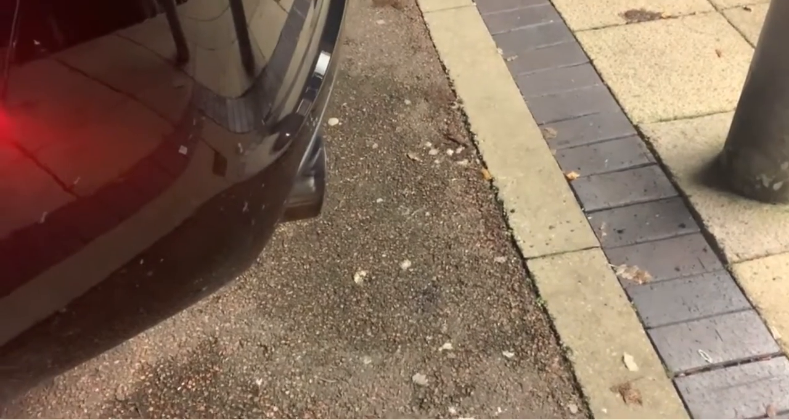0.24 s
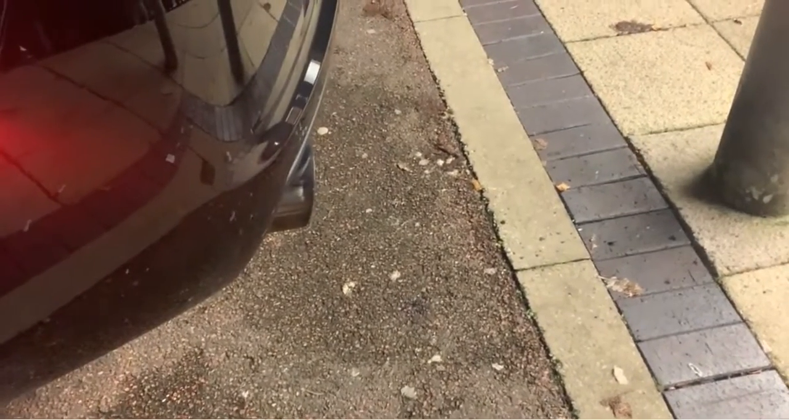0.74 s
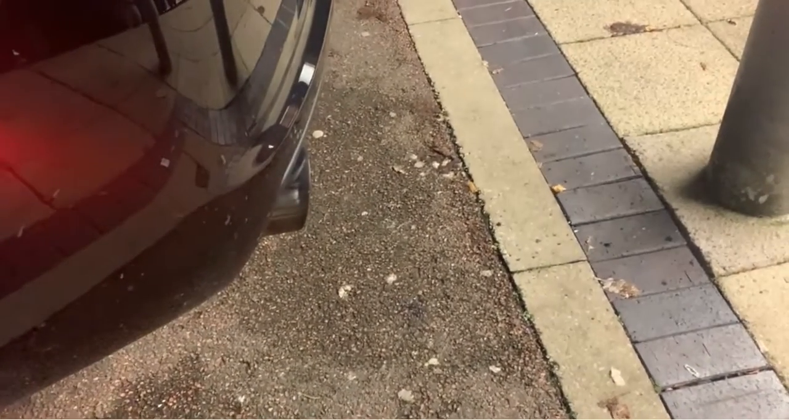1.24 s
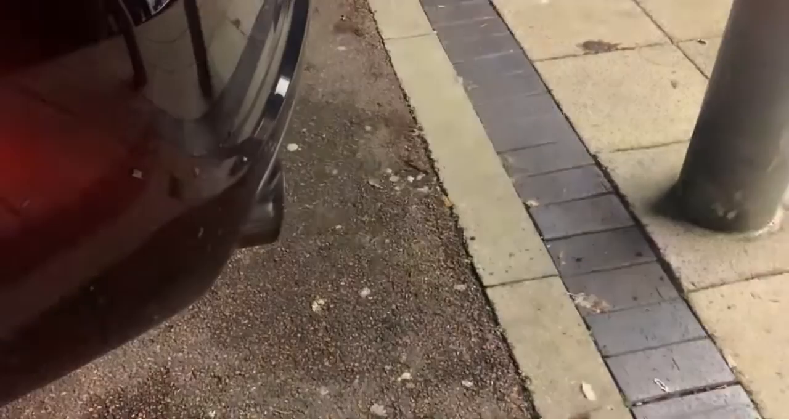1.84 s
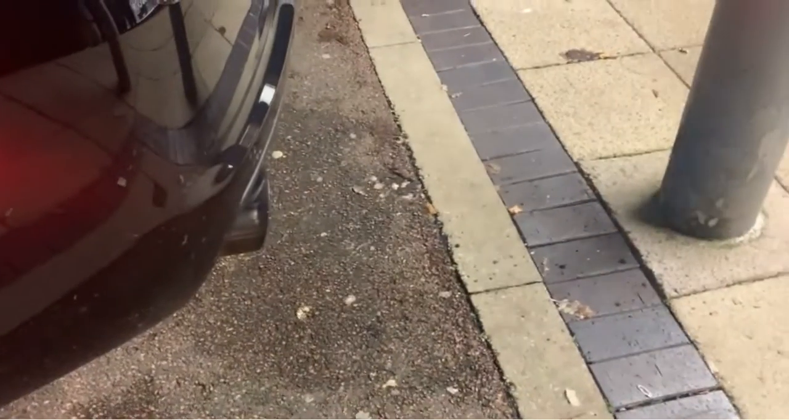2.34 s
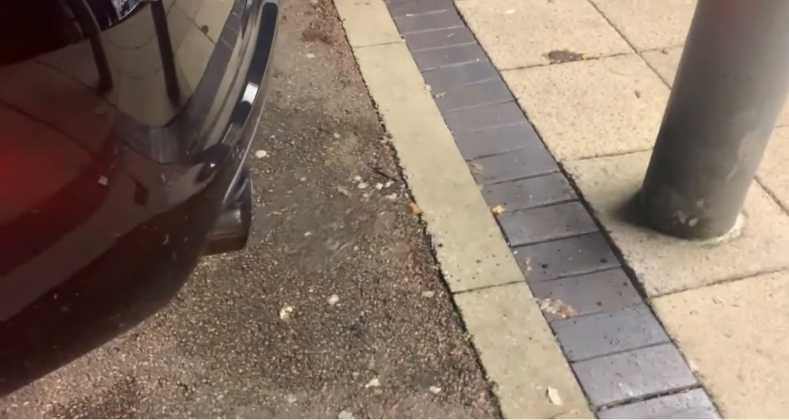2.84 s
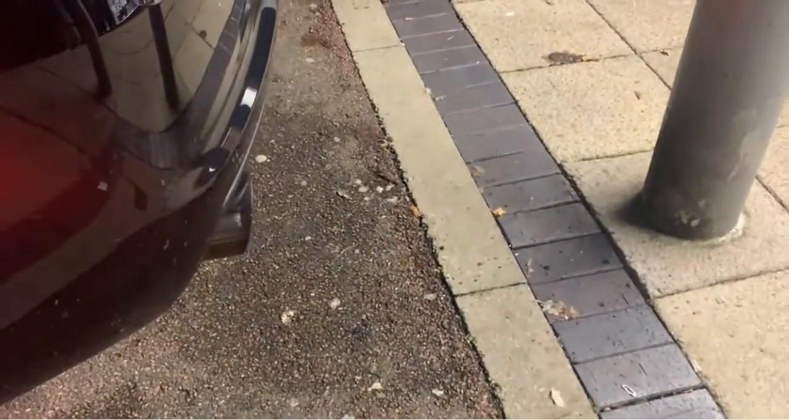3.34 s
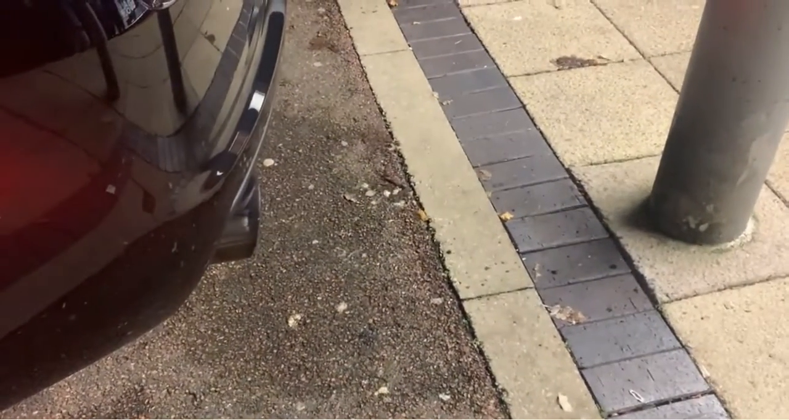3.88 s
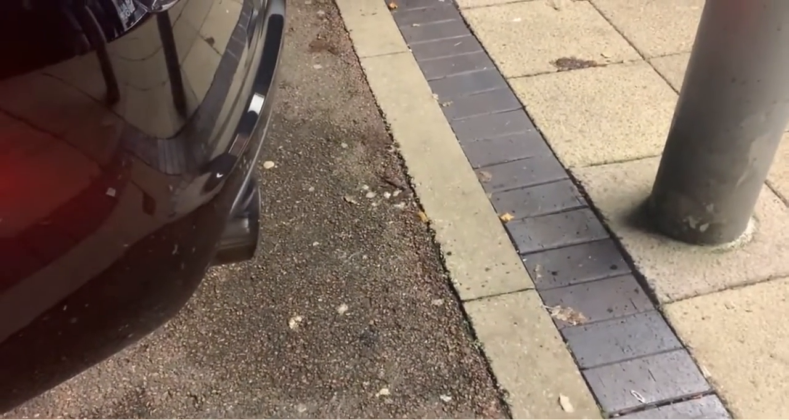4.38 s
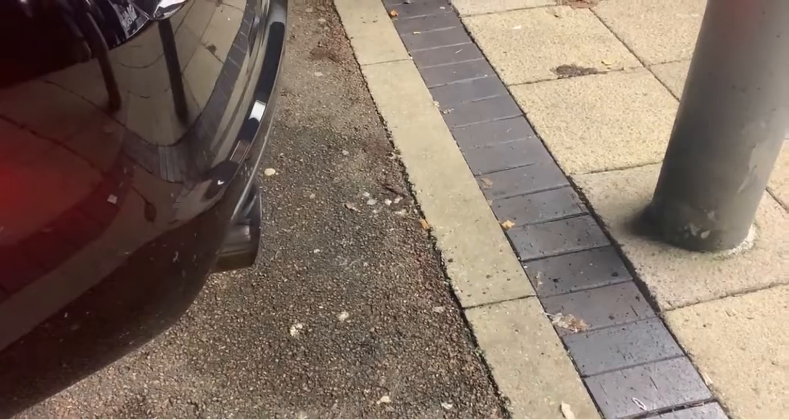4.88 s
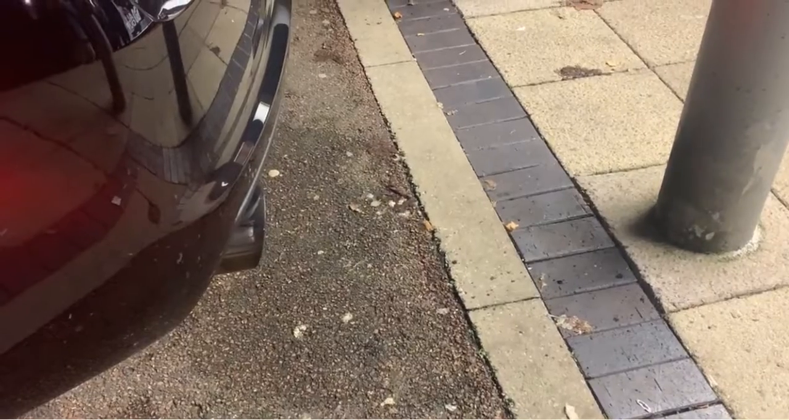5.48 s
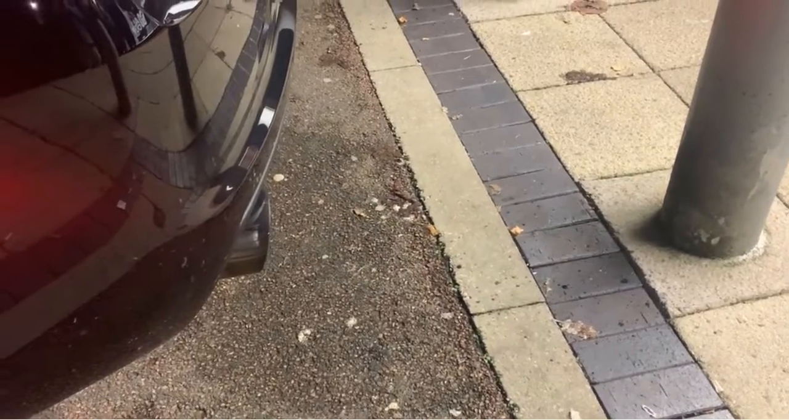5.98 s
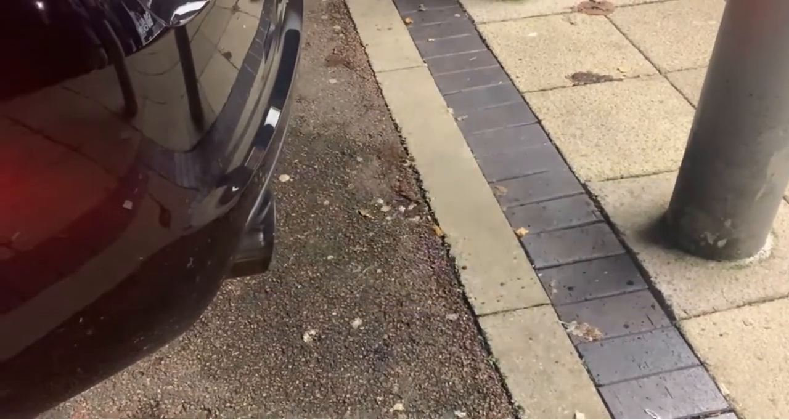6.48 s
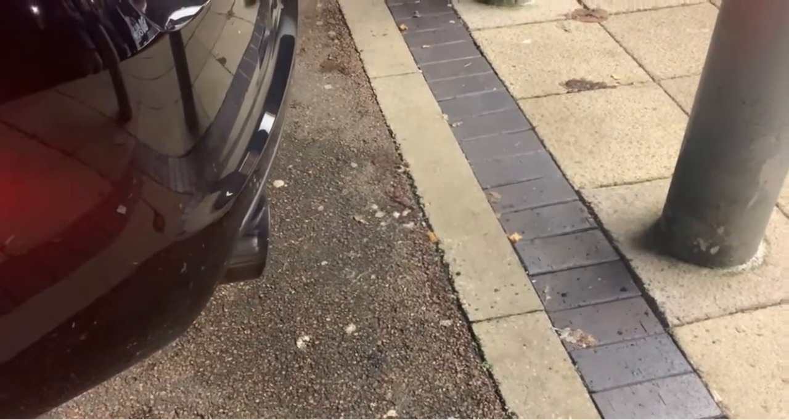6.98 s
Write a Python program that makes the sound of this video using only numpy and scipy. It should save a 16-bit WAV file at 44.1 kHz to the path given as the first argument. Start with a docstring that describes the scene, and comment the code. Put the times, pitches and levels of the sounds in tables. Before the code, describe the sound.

A parked car idles roughly while its hot tailpipe backfires in tight bursts of gunshot-like pops and cracks, echoing off nearby house fronts.

```python
"""Idling car with exhaust backfire

A parked car idles with a lumpy beat on a night street; unburnt fuel explodes in its hot exhaust in volleys of pops.
Each pop sums a crack, pipe resonances and a falling chirp, a silencer thump and a ragged roar of shaped noise.
Firing impulses and noise excite the silencer modes for the idle, over rasping and hissing gas noise.
House fronts return a long hiss, made by decaying noise echoes, and far traffic is a steady low noise.
A microphone close by limits the loudest blasts."""
import sys
import numpy as np
from scipy import signal
from scipy.fft import rfft, irfft, next_fast_len
from scipy.io import wavfile
from scipy.ndimage import uniform_filter1d, minimum_filter1d, map_coordinates

SR = 44100
rng = np.random.default_rng(int(sys.argv[2]) if len(sys.argv) > 2 else 0)


def wav_record(signal):
    """Record a signal, one row per channel, as 16-bit PCM in the file named by sys.argv[1]."""
    frames = np.transpose(np.atleast_2d(signal))
    bounded = np.clip(frames, -1, 1)
    # unit amplitude maps onto the largest positive 16-bit level
    quanta = np.round(bounded * 32767).astype(np.int16)
    wavfile.write(sys.argv[1], SR, quanta)


N = 318400

# explosions in the exhaust: start_s, level_db, thump_db (relative to level_db),
# brightness_db_per_octave (well above 1100 Hz), snap_db (relative to level_db)
EXPLOSIONS = [(.177, -18.5, -33, -7.5, -5), (.206, -32, -3, -4, -1), (.276, -21, -13, -1, 5),
              (.293, -18, 4, -6, 0), (.301, -10, 0, -1.5, 1), (.325, -6, 3, -2, -6), (.35, -1, -3, -3, -13),
              (.375, -3.5, -11, -4, 1), (.394, -5.5, -15, -2, -4), (.416, -6.5, -10, -8, -1),
              (.442, -13, -1, -4, 7), (.484, -24, 2, 3, -3), (.694, -6.5, -2, -13, -3),
              (.856, -0.5, -25, 1, 2), (.891, -8, -10, 2, -5), (.912, 2.5, -6, 1.5, 14.5),
              (.956, -13, -3, 3.5, -3), (.984, -11, 0, -1.5, -7), (1.023, -17, -10, -0.5, 0),
              (1.069, -12, -6, -4, -4), (1.082, 1, -1.5, -3.5, -3), (1.11, -3, -13, -0.5, 0.5),
              (1.133, 1.5, -9, -2.5, 0), (1.161, -7.5, -30, 1, -5), (1.175, -18, 4, 3.5, -2),
              (1.203, -21.5, 4, 1, 2), (1.514, 0, -19, -2.5, -0.5), (1.548, -6, 1.5, -3.5, -19),
              (1.579, -17, -4, -6, -6), (1.705, -17, 4, -1, -6), (1.722, -8, -12, 1, 11),
              (1.735, -2, -13, -6, -1), (1.755, -1.5, -12, -2, 7), (1.781, 0, -30, -1, 8),
              (1.811, -4, -14, -0.5, 1), (1.822, -5.5, -24, -0.5, 8), (1.85, -10, -22, 0.5, -6),
              (2.156, -16, -5, -10, -2.5), (2.248, -12.5, -7, -11, -29), (2.371, -1, -4, -3.5, 8),
              (2.396, -6, -21, 3.5, 5), (2.423, 0.5, -15, 2.5, 8), (2.44, -10, -7, 0, -1),
              (2.459, -10.5, -22, 0.5, -10), (2.526, -16, 3, 0.5, 0), (2.543, -15.5, 2, -6, 5),
              (3.01, -4, -32, -1, 1), (3.024, -2, -17, -5.5, -6), (3.049, -13.5, 3, -8, -7),
              (3.114, -19, 3.5, -9, -2), (3.206, -7, -5, -3.5, -22), (3.225, -0.5, -13, -3.5, -3),
              (3.249, -6, -20, 1.5, 6), (3.273, -10, -6, 2, -6), (3.385, -13, 0, -13, -6),
              (3.401, -13.5, -2, -11, 4), (3.7, -4.5, -18, 1.5, 4), (3.708, -17, -26, 4.5, 3),
              (3.725, -8, 0, -1, -13), (3.742, -3, -25, -2.5, -4), (3.76, -8.5, -11, -9, -4),
              (3.977, -24.5, 6, -18, 2), (4.056, -17.5, -5, -3.5, 3), (4.064, -9.5, -5.5, -4.5, -15),
              (4.079, -15, -6.5, -2, -23), (4.093, -11, 0, -3, -13), (4.119, -15.5, -11, -7, 5),
              (4.415, -21, 7, -5.5, -2), (4.683, -26.5, 9.5, 1.5, -3), (4.74, -22.5, 2, -4, -7.5),
              (4.755, -6.5, -6, -5.5, -4.5), (4.775, -6, -6, -3, 6), (4.789, -4.5, -8, -2, -1),
              (4.809, -1.5, -8, -3, 1), (4.829, -5.5, -5, 2, 2), (4.849, -5, -17, 0.5, -1),
              (4.872, -9.5, -11, 0.5, 8), (4.989, -4.5, -8.5, -3.5, 2.5), (5.031, -14, -3, -5, -7),
              (5.071, -13.5, -2, -5, -8), (5.099, -9.5, -7, -9, -3), (5.196, 0, -16.5, 1.5, 10),
              (5.208, -10.5, -13, -1, 1), (5.229, -12, -8, 2.5, 2), (5.253, -23, -6, -1.5, 10),
              (5.497, -10.5, -11, -3.5, -6), (5.512, -7, -6, 0, 4.5), (5.519, -0.5, -3, -14, -3),
              (5.538, -10.5, 2.5, -17, -13), (5.57, -15, 0, -6, -7), (5.8, -14, -2, -13, -38),
              (5.905, -5.5, -2, -6.5, -8), (5.921, 1, -14, 1, 7), (5.952, -8.5, -9, 2, 6),
              (5.968, -5, -4, 0.5, 8), (5.993, 4, -7, -0.5, -9), (6.036, -6, -19, -1.5, 5),
              (6.059, -18, -7, -8, 8), (6.402, -2.5, -0.5, .5, -15), (6.432, 0, -16, 1, -4),
              (6.459, -15.5, 3, 0, -5), (6.513, -18, -10, -17, -6), (6.658, 0.5, -23, 1, 9),
              (6.684, -3, -5, -1.5, 9), (6.709, -12, -16, 1.5, 6), (6.74, -30, -21, -5, 2),
              (6.865, -10, -6, -4, 10.5), (6.955, -13.5, -4, -4.5, -5), (7.061, -1.5, -42, -1, 3),
              (7.07, -16, -30, -7, 9), (7.085, -4.5, -10, 3, 6), (7.111, -4.5, -35, 1.5, 2),
              (7.129, -8, -5, 3, 10), (7.157, -10.5, -26, 0.5, 0)]
# resonances of the silencer chambers: centre_hz, width_hz, gain_db
SILENCER_MODES = [(64.4, 43.3, 5), (114, 20, 3.5), (146.7, 15.1, 1.5), (180, 26.4, -6.5), (252, 47, -10.5)]


def amp(db):
    """Amplitude ratio: 20 dB stand for a factor of ten."""
    return 10 ** (np.asarray(db) / 20)


def unit(x):
    """Normalization by signal power: x at rms 1."""
    return x / np.sqrt(np.mean(x ** 2) + 1e-20)


def along(points, hz):
    """Linear interpolation of (frequency, value) points on a logarithmic frequency axis."""
    point_hz, values = np.transpose(points)
    return np.interp(np.log(hz + 1), np.log(point_hz + 1), values)


def curves(rows):
    """Linear interpolation in time: one value per sample for each column after the time."""
    time_s, *columns = np.transpose(rows)
    return [np.interp(np.arange(N) / SR, time_s, column) for column in columns]


def wobble(rate_hz):
    """Band-limited random fluctuation: a spline through rate_hz random knots a second."""
    knots = rng.standard_normal(int(N * rate_hz / SR) + 4)
    return map_coordinates(knots, [np.arange(N) * rate_hz / SR])


def filtered(x, response):
    """Linear filtering: the spectrum of x times a complex frequency response."""
    size = next_fast_len(x.shape[-1] + 8192)  # zero padding leaves room for the ringing
    spectrum = rfft(x, size) * response(np.fft.rfftfreq(size, 1 / SR))
    return irfft(spectrum, size)[..., :x.shape[-1]]


def modes(table):
    """Modal superposition: causal damped resonators of alternating sign, each from (centre, width, gain)."""
    def response(hz):
        total = 0
        for k, (centre, width, db) in enumerate(table):
            damping = 1j * hz * width
            total = total + (-1) ** k * amp(db) * damping / (centre * centre - hz * hz + damping)
        return total
    return response


def causal(gain):
    """Minimum phase: folding the cepstrum turns a gain curve into a response with no output before its input."""
    def response(hz):
        cepstrum = irfft(np.log(gain(hz) + 1e-6))
        cepstrum[1:len(cepstrum) // 2] *= 2
        cepstrum[len(cepstrum) // 2 + 1:] = 0
        return np.exp(rfft(cepstrum))
    return response


def coloured(spectrum):
    """Spectral shaping: white noise filtered to a (frequency, level) curve, at rms 1."""
    return unit(filtered(rng.standard_normal(N), lambda hz: amp(along(spectrum, hz))))


def muffled(hz):
    """Acoustic filtering: baffles round off pressure steps and leaking walls lose the slowest swings."""
    leak = (1j * hz / 45 / (1 + 1j * hz / 45)) ** 2
    baffles = 1 / (1 + 1j * hz / 450) ** 3
    return leak * baffles


def tailpipe_chirp(t):
    """Dispersion: the highest pitches leave the tailpipe first, so the tone glides down to 600 Hz."""
    cycles = 600 * t + 2200 * 0.001125 * (1 - np.exp(-t / 0.0011))
    decay = amp(-60 * t / 0.043)
    onset = 1 - np.exp(-t / 0.0003)
    return np.sin(2 * np.pi * cycles) * decay * onset


def pops():
    """Impulsive combustion: each shock excites pipe and silencer modes, and burning gas radiates shaped noise."""
    # resonances of the exhaust pipe: centre_hz, width_hz, gain_db
    pipe = [(308, 30.4, 7), (460, 110, -1), (692, 108, 2), (920, 130, -50), (1280, 40, -41),
            (1450, 870, -4), (1720, 3600, -6)]
    # spectrum of the burning gas before the pipe colours it: frequency_hz, level_db
    blast_spectrum = [(16, -46), (28, -12), (64, -15), (114, 2.5), (145, -5), (180, -0.5), (261, -5.5),
                      (306, -9), (610, -2), (817, -12), (1150, -9), (7810, -32), (10500, -38.5),
                      (16000, -52)]
    chirp_db, crack_db, scatter_size_db = -12, -8, 3.5  # parts of the snap, and their scatter from pop to pop
    rise_s, rise_slows = 0.00091, 0.85  # flame rise of a 0 dB pop; dB longer for each dB weaker
    flicker_db, flicker_hz = 2.6, 300

    out = np.zeros(N + SR)
    t = np.arange(SR // 5) / SR
    noise = rng.standard_normal((len(EXPLOSIONS), len(t)))
    ragged = rng.standard_normal((len(EXPLOSIONS), 100))
    scatter_db = scatter_size_db * rng.standard_normal((len(EXPLOSIONS), 2))

    chirp = tailpipe_chirp(t)
    shock = np.eye(1, len(t))[0]  # a single-sample impulse
    ring = filtered(shock, modes(pipe))
    ring = ring / np.abs(ring).max()
    thump = filtered(filtered(shock, muffled), modes(SILENCER_MODES))
    thump = thump / np.abs(thump).max()
    # the pipe colours the flame
    blast = causal(lambda hz: amp(along(blast_spectrum, hz)) * (1.52 + np.abs(modes(pipe)(hz))))
    gases = filtered(noise, blast)

    for explosion, white, gas, knots, (chirp_scatter_db, crack_scatter_db) in zip(
            EXPLOSIONS, noise, gases, ragged, scatter_db):
        start_s, level_db, thump_db, bright_db, snap_db = explosion
        flicker = flicker_db * np.interp(t * flicker_hz, np.arange(len(knots)), knots)
        flame = amp(flicker - 60 * t / 0.13)
        flame *= 1 - np.exp(-t / (rise_s * amp(-rise_slows * level_db)))
        tilt = causal(lambda hz: amp(bright_db * np.log2(np.hypot(hz / 1100, 1))))
        roar = filtered(0.52 * flame * gas / gas.std(), tilt)

        crack = 0.6 * filtered(white * amp(-60 * t / 0.011), blast) / gas.std()
        snap = amp(chirp_db + chirp_scatter_db) * chirp
        snap += amp(crack_db + crack_scatter_db) * (0.26 * ring + crack)

        pop = amp(snap_db) * snap + roar + amp(thump_db) * thump
        out[round(start_s * SR):][:len(t)] += amp(level_db) * pop
    return out[:N]


def afterburn(steady_db, burn_db, rise_s, t60_s, bright_weight):
    """Power addition: steady gas flow plus fuel that burns on after every pop and decays exponentially."""
    start_s, level_db, _, bright_db, _ = np.transpose(EXPLOSIONS)
    coarse = np.arange(0, N + 100, 100)  # every hundredth sample is enough for a slow envelope
    since_s = np.clip(coarse[:, None] / SR - start_s, 0, None)
    burn = amp(burn_db + level_db + bright_weight * bright_db - 60 * since_s / t60_s)
    burn *= 1 - np.exp(-since_s / rise_s)
    power = np.interp(np.arange(N), coarse, np.sum(burn ** 2, axis=1))
    return np.sqrt(amp(steady_db) ** 2 + power)


def idle():
    """Forced resonance: three uneven firings a turn boom in the silencer, and puffs modulate the gas noise."""
    # crank speed hunting up after each volley and sagging again: time_s, turns_per_s
    crank_speed = [(0, 18.6), (.2, 18.3), (.45, 20.6), (.82, 17.8), (1.2, 21.4), (1.53, 18.6), (1.94, 24.4),
                   (2.2, 22.1), (2.52, 23.8), (2.96, 19), (3.27, 20.8), (3.7, 16.5), (3.88, 16.5),
                   (4.15, 18.4), (4.4, 16.1), (5.31, 23.5), (5.75, 18.2), (6.1, 25.4), (6.6, 18.2),
                   (7.22, 17.8)]
    # relative strength of the three firings of a turn: level_db
    cylinders_db = [0, -11, -7.5]
    # idle beat: time_s, deep_beat_db, upper_beat_db
    beat = [(0.0, -20.5, -21.5), (0.44, -33, -22.5), (0.9, -23, -23.5), (1.29, -29, -26.5),
            (1.69, -22.5, -23), (1.81, -25.5, -29), (2.01, -28.5, -31), (2.25, -32, -26),
            (2.41, -27.5, -31), (2.79, -29.5, -32), (2.99, -23, -27.5), (3.22, -26.5, -25),
            (3.42, -34, -30), (3.68, -25, -23.5), (3.82, -31.5, -27), (4.91, -26.5, -27.5),
            (5.49, -28, -29), (5.89, -26, -29.5), (6.19, -29, -31), (6.52, -34, -22.5),
            (6.88, -26.5, -34.5), (7.22, -31, -30)]
    # steady gas flow under the pops: time_s, rasp_db, hiss_db
    gas_flow = [(0.0, -36, -45.5), (0.58, -31.5, -37), (0.9, -31, -41.5), (1.03, -22.5, -40.5),
                (1.31, -34.5, -41.5), (1.81, -33, -40), (3.04, -39, -47.5), (3.16, -36, -48),
                (4.2, -43, -50.5), (4.77, -34, -48.5), (4.95, -30.5, -40), (5.57, -37.5, -45.5),
                (6.94, -32.5, -41.5), (7.22, -37, -53)]
    # spectrum of the rasping gas: frequency_hz, level_db
    rasp_spectrum = [(120, -26), (200, -12), (300, 1), (400, -4.5), (450, -3), (480, 2.5), (515, -6),
                     (620, -4.5), (800, -13), (1500, -20.5), (3000, -53)]
    # spectrum of the hissing gas: frequency_hz, level_db
    hiss_spectrum = [(470, -35), (800, -15), (1020, -28), (1210, 0.5), (1780, -2), (3510, -2.5),
                     (4930, -7.5), (6820, -9.5), (11100, -14.5), (16000, -33)]

    deep_db, upper_db = curves(beat)
    rasp_db, hiss_db = curves(gas_flow)
    turns = np.cumsum(curves(crank_speed)[0] * (1 + 0.01 * wobble(15))) / SR
    count = np.floor(len(cylinders_db) * turns).astype(int)
    strength_db = np.take(cylinders_db, count, mode="wrap") + 2.3 * wobble(40)
    firings = np.diff(count, prepend=0) * amp(strength_db)  # an impulse wherever the count steps up
    pressure = filtered(unit(firings) + 0.4 * rng.standard_normal(N), muffled)

    # the big chamber passes the gas twice
    deep = unit(filtered(pressure, lambda hz: modes(SILENCER_MODES[:1])(hz) ** 2))
    upper = unit(filtered(pressure, modes(SILENCER_MODES[1:])))

    puff = np.cos(2 * np.pi * turns - 0.8)  # one puff a turn
    rasp = unit(amp(0.13 * puff + 1.6 * wobble(40)) * coloured(rasp_spectrum))
    hiss = unit(amp(0.3 * puff + 0.21 * wobble(10)) * coloured(hiss_spectrum))
    rasp_gain = afterburn(rasp_db, burn_db=-41, rise_s=7, t60_s=4, bright_weight=0.3)
    hiss_gain = afterburn(hiss_db, burn_db=-32, rise_s=-7.5, t60_s=2.5, bright_weight=6)
    return amp(deep_db) * deep - amp(upper_db) * upper + rasp_gain * rasp + hiss_gain * hiss


def street(x):
    """Diffuse reverberation: house fronts answer with noise echoes whose decay time depends on frequency."""
    # reverberation of the street: frequency_hz, t60_s
    decay_times = [(100, 0.23), (600, 0.36), (2500, 0.38), (8000, 0.37), (14000, 0.22)]
    out = np.zeros(N + 2 * SR)
    hop = SR // 4  # each quarter second meets new echoes
    for start in range(0, N, hop):
        hz, t, echoes = signal.stft(rng.standard_normal(SR), SR, nperseg=256)
        decay = amp(-60 * t / along(decay_times, hz)[:, None])
        onset = 1 - np.exp(-t / 0.0089)  # the first echoes arrive late
        tail = signal.istft(echoes * decay * onset, SR, nperseg=256)[1]
        wet = signal.fftconvolve(x[start:start + hop], tail / np.linalg.norm(tail))
        out[start:][:len(wet)] += wet
    return out[:N]


def hush():
    """Level modulation: the background sinks as each loud pop nears and is back soon after."""
    depth_db, width_s, half_depth_db = 3, 0.085, -3.5  # a pop at half_depth_db gives half the depth
    start_s, level_db = np.transpose(EXPLOSIONS)[:2]
    coarse = np.arange(0, N + 100, 100)
    until_s = start_s - coarse[:, None] / SR
    loudness = 1 / (1 + amp(2 * (half_depth_db - level_db)))
    dip = np.max(loudness * np.exp(-(until_s / width_s) ** 2), axis=1)
    return amp(-depth_db * np.interp(np.arange(N), coarse, dip))


def scene():
    """Superposition: the pops, their echo, the idling engine and far traffic add at one microphone."""
    # spectrum of the far traffic: frequency_hz, level_db
    traffic_spectrum = [(15, -28), (28, 23), (45, 14), (80, -43)]
    bangs = pops()
    background = hush() * (amp(-10) * street(bangs) + idle())
    traffic = amp(-48) * coloured(traffic_spectrum)
    return (bangs + background + traffic)[None]


def record(dry):
    """Dynamic limiting: a fast gain holds the peaks, saturation rounds them, and the band limit ends the treble."""
    ceiling, saturation, top_hz = 0.7, 0.74, 15950
    need = np.minimum(1, ceiling / (np.abs(dry) + 1e-9))
    # the gain falls shortly ahead of a peak and is held after it
    gain = uniform_filter1d(minimum_filter1d(need, size=221, origin=60), size=101)
    limited = dry * gain
    rounded = limited / (1 + np.abs(limited / saturation) ** 6) ** (1 / 6)

    def microphone(hz):
        """Band limitation: weak deep bass, a dull top octave and nothing from top_hz up."""
        bass = hz ** 2 / (hz ** 2 + 30 ** 2)
        treble = 0.26 + 0.73 / (1 + (hz / 12500) ** 16)
        return (hz < top_hz) * bass * treble
    return filtered(rounded, microphone)


dry = scene()
out = record(dry)
wav_record(out)
```